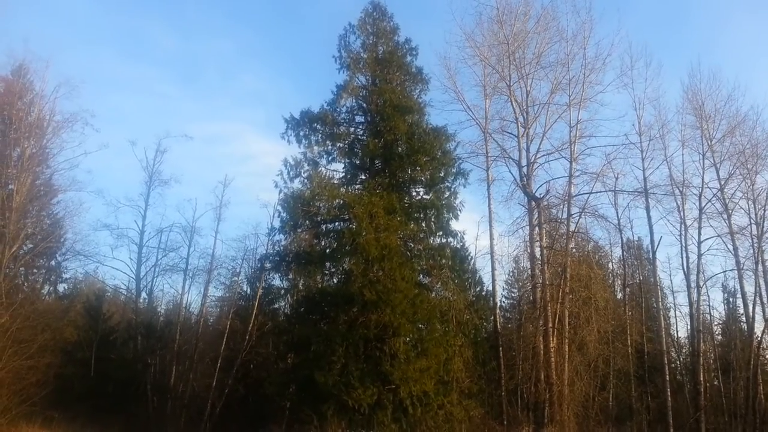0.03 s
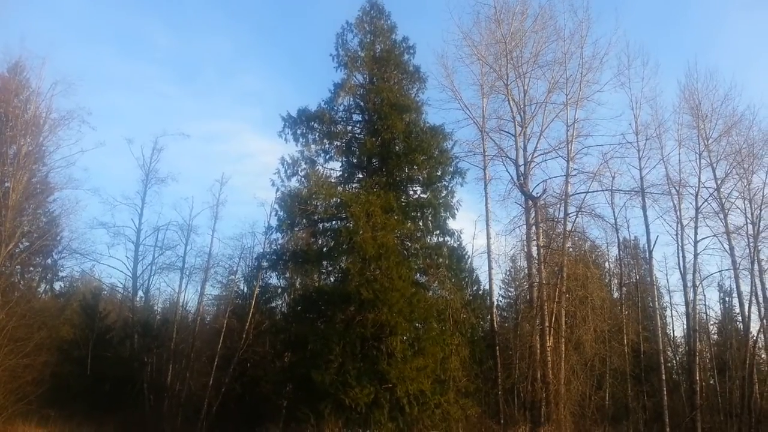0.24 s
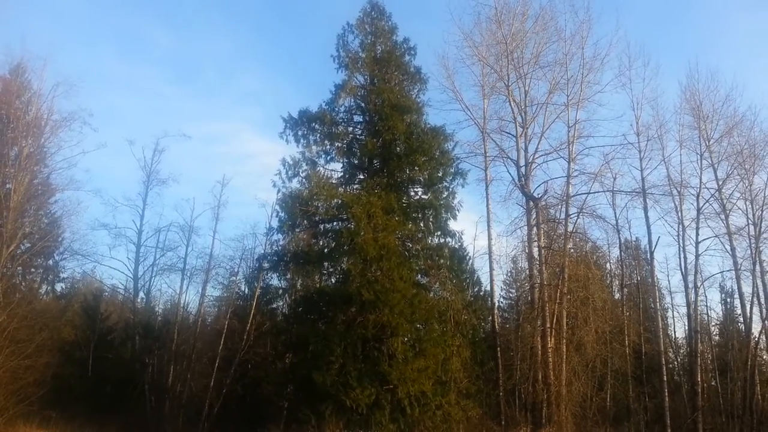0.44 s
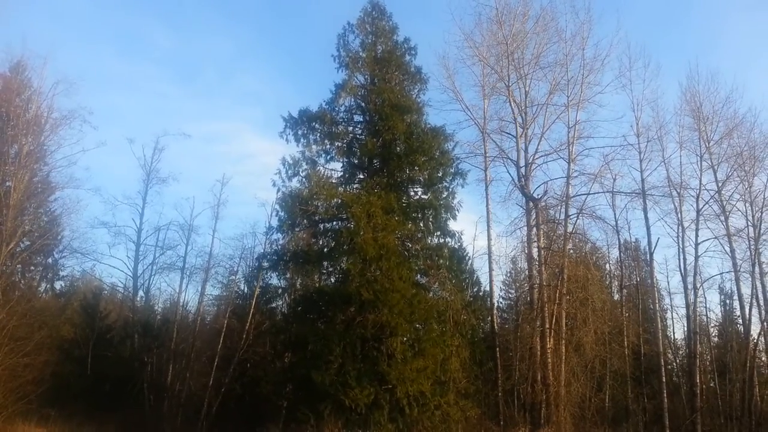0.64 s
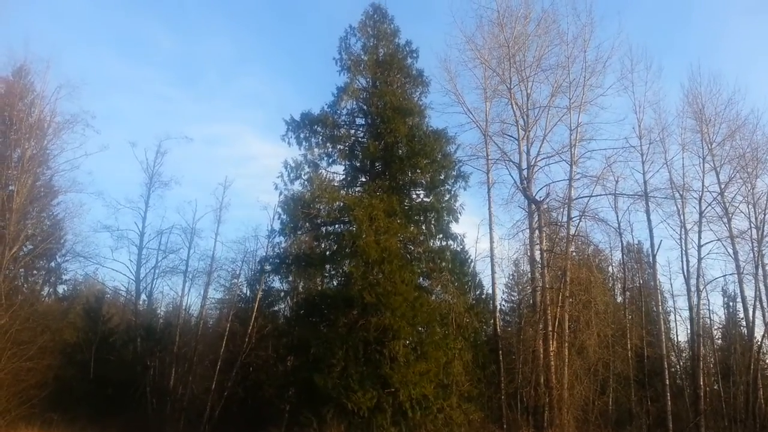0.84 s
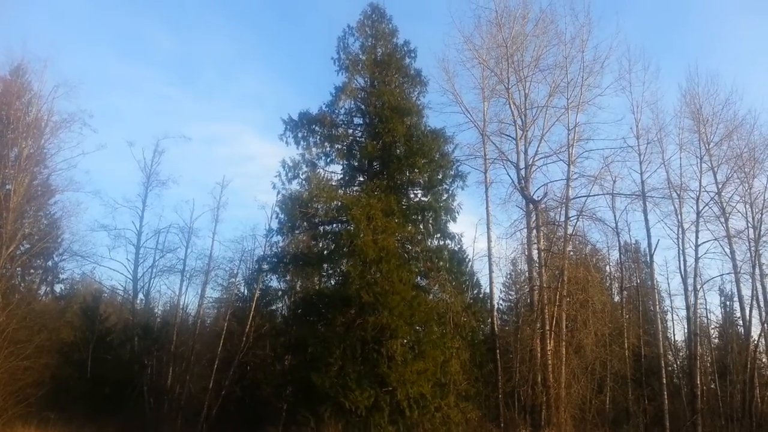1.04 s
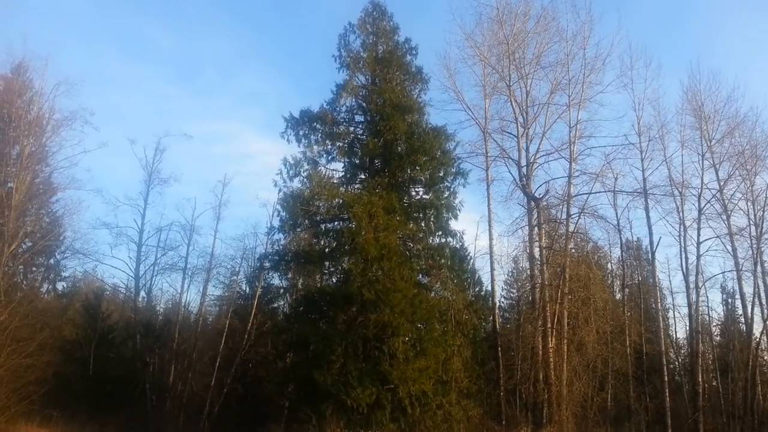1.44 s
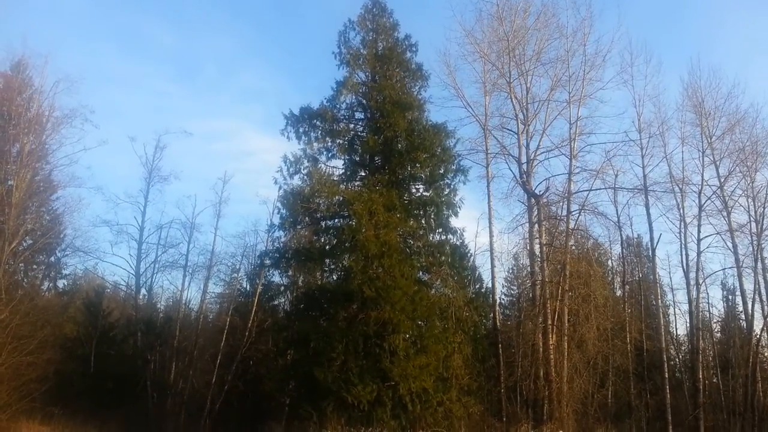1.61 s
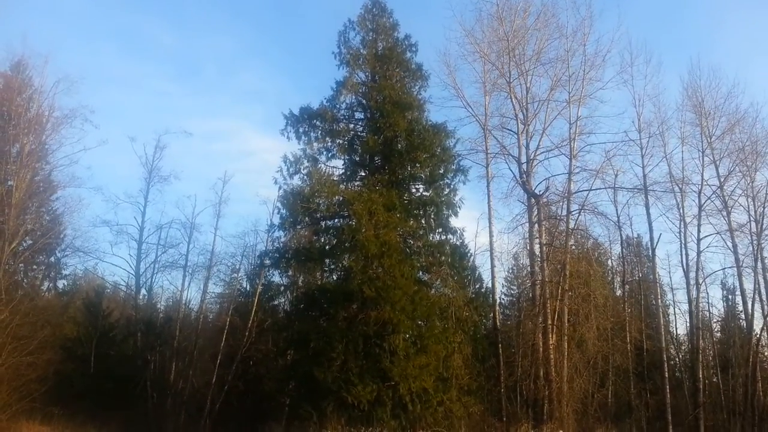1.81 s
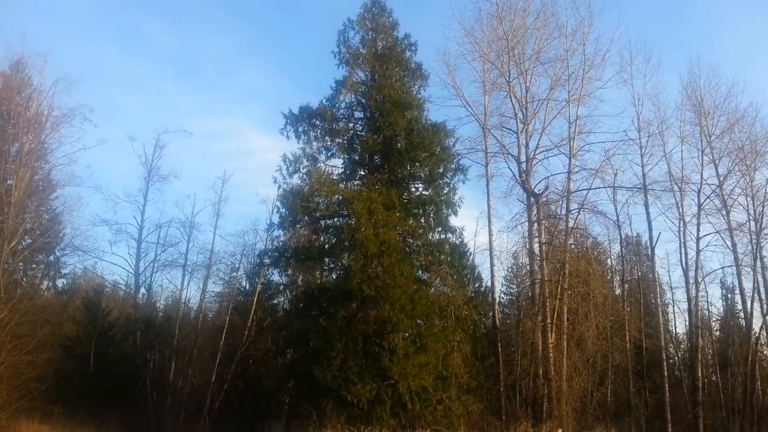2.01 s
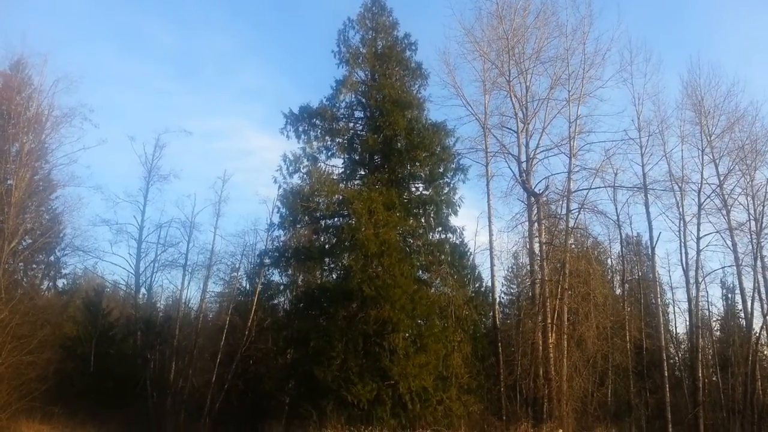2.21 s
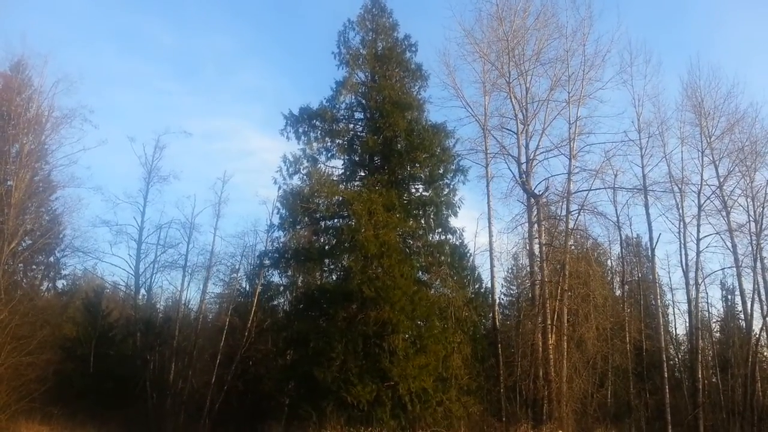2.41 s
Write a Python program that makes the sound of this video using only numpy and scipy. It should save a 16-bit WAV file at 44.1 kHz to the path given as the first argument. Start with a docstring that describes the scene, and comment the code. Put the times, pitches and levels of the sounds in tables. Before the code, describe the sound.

A bullet whizzes over the microphones with a quick falling whistle and gritty hiss. Sharp cracks come back from trees on the left, then distant reports roll away and fade into the quiet of a woodland edge.

```python
"""A quiet woodland edge, a stereo pair of microphones under the path of a bullet.
After a soft thud close by, the bullet passes overhead: a falling whistle and a low swoop in gritty hiss.
Sharp cracks come back from the trees on the left, over a low hum and a wash of shock scattered by twigs
and trunks; then distant reports roll away. A far bird, a low rumble on the microphones and a small tick
follow."""
import sys
import numpy as np
from scipy import signal
from scipy.fft import rfft, irfft
from scipy.io import wavfile
from scipy.ndimage import uniform_filter1d

SR = 44100
rng = np.random.default_rng(int(sys.argv[2]) if len(sys.argv) > 2 else 0)


def waveform_to_disk(signal):
    """Save audio, clipped to [-1, 1], as 16-bit WAV at the path in sys.argv[1]."""
    frames = np.transpose(np.atleast_2d(signal))
    scaled = np.clip(frames, -1, 1) * 32767
    samples = np.round(scaled).astype(np.int16)
    wavfile.write(sys.argv[1], SR, samples)


N = 112454
T = np.arange(N) / SR
FRAME_S = np.arange(N // 256 + 5)[:, None] * 256 / SR  # times of the short noise frames
HZ = np.fft.rfftfreq(1024, 1 / SR) + 1  # bins of one frame
HZ_FINE = np.fft.rfftfreq(N, 1 / SR) + 1  # bins of the whole scene


def amp(db):
    return 10 ** (np.asarray(db) / 20)


def unit_rms(x):
    return x / np.sqrt(np.mean(x ** 2) + 1e-20)


def spectrum(points, hz):
    """A table's values at hz, joined on a log-frequency axis."""
    freqs, values = np.transpose(points)
    return np.interp(np.log(hz), np.log(freqs), values)


def resonances(modes, hz):
    """The summed gain of a few flat-topped peaks."""
    return sum(amp(db) / (1 + (2 * (hz - centre) / width) ** 4) for centre, width, db in modes)


def follow(rows, column):
    """One column of a time curve at every sample."""
    rows = np.array(rows)
    return np.interp(T, rows[:, 0], rows[:, column])


def envelope(rows, column=1):
    """Gain along a level curve, faded in and out over 2 ms at its ends."""
    gate = np.clip((T - rows[0][0]) / .002, 0, 1) * np.clip((rows[-1][0] - T) / .002, 0, 1)
    return amp(follow(rows, column)) * gate


def pan(pan_db):
    """Gains at the two microphones; pan_db is left minus right."""
    return amp(np.array([[.5], [-.5]]) * pan_db)


def phase(pitch_hz):
    return 2 * np.pi * np.cumsum(pitch_hz) / SR


def add(mix, start_s, sound):
    part = mix[:, round(start_s * SR):][:, :sound.shape[1]]
    part += sound[:, :part.shape[1]]


def complex_noise(*shape):
    return rng.standard_normal(shape) + 1j * rng.standard_normal(shape)


# How alike diffuse sound is at the two microphones: freq_hz, correlation
MIC_CORRELATION = [(30, -0.67), (120, .65), (500, 0.45), (1200, .35), (2500, .05), (4500, -0.091),
                   (7000, -0.094), (14000, .05)]
def noise(colour_db, change_db=0):
    """Coloured stereo noise of unit level, then raised or lowered frame by frame by change_db."""
    left, unrelated = complex_noise(2, len(FRAME_S), len(HZ))
    alike = spectrum(MIC_CORRELATION, HZ)
    right = alike * left + np.sqrt(1 - alike ** 2) * unrelated
    frames = np.array([left, right]) * unit_rms(amp(colour_db))
    steady, changing = (
        signal.istft(z, nperseg=1024, noverlap=768, time_axis=1, freq_axis=2)[1][:, :N]
        for z in (frames, frames * amp(change_db)))
    return changing / steady.std()


def grit(depth_db, samples):
    """A flickering gain, like the uneven strength of the tiny echoes in a wash."""
    flicker = uniform_filter1d(uniform_filter1d(rng.standard_normal(N), samples), samples)
    return unit_rms(amp(depth_db * np.clip(unit_rms(flicker), -3, 3)))


# Woodland background, all around: freq_hz, gain_db
AIR_COLOUR = [(25, -16.5), (60, -8), (150, -6.5), (250, -12), (550, -16.5), (850, -12), (1250, -18),
              (2200, -26), (4300, -26.5), (8000, -30), (13500, -27.5), (15000, -32.5)]
def air():
    """The quiet of the woodland, a little louder on the left."""
    return noise(spectrum(AIR_COLOUR, HZ)) * amp(-68.5) * pan(5) * grit(depth_db=0.3, samples=900)


# Knocks near the microphones: start_s, level_db, tilt_db_per_octave, decay_s, rustle_db
KNOCKS = [(0.0514, -39.5, -0.5, 0.0095, -19), (2.4953, -63, 11, 0.018, -7.5)]
# Their tone before the tilt: freq_hz, gain_db
KNOCK_COLOUR = [(30, -11), (90, -2), (200, -8.5), (500, -32.5), (1100, -11.5), (2000, -16), (2900, -15),
                (4500, -27.5), (8000, -34.5), (15000, -48)]
def knocks(rustle_s=0.0105):
    """A dull thud first and a faint bright knock last, each inside a brief rustle."""
    out = np.zeros((2, N))
    for start, db, tilt_db, decay_s, rustle_db in KNOCKS:
        away_s = abs(T - start)
        hit = (T >= start) * np.exp(-away_s / decay_s)
        rustle = amp(rustle_db) * np.exp(-away_s / rustle_s)
        out += amp(db) * (hit + rustle) * noise(spectrum(KNOCK_COLOUR, HZ) + tilt_db * np.log2(HZ))
    return out * pan(2.5)


# Hiss of the incoming bullet: time_s, level_db
APPROACH = [(.14, -88), (.168, -72), (.188, -64), (.198, -76), (.209, -62), (.2135, -49.5), (.225, -49),
            (.25, -52), (.27, -76)]
# Its tone: freq_hz, gain_db
APPROACH_COLOUR = [(100, -12.5), (700, -9.5), (1600, -15), (2600, -3.5), (3800, -7), (6100, 1),
                   (7500, -4.5), (9500, -14.5), (15000, -19.5)]
def approach():
    """A faint hiss runs ahead of the bullet and jumps just before it passes."""
    return noise(spectrum(APPROACH_COLOUR, HZ)) * envelope(APPROACH) * grit(depth_db=2.5, samples=30)


# Hollows in the hiss just after the pass: centre_s, half_length_s, freq_hz, half_width_octaves, gain_db
HOLLOWS = [(.305, .035, 1380, .2, -24), (.297, .028, 620, .35, -20), (.39, .05, 450, .3, -22),
           (.284, .012, 3450, .1, -26)]
def hollows():
    """Brief dips in the spectrum, in dB, that give the pass its phasing sound."""
    return sum(db * np.exp(-((FRAME_S - centre) / length) ** 2 - (np.log2(HZ / hz) / width) ** 2)
               for centre, length, hz, width, db in HOLLOWS)


# The bullet's wake overhead: time_s, level_db, pan_db
WAKE = [(.221, -75, -4), (.227, -45.5, -3), (.236, -33.5, 2.5), (.25, -26, 1), (.266, -25, 2.5),
        (.283, -27.5, 5.5), (.325, -33, 3.5), (.43, -39.5, -0.5), (.56, -43, -1.5), (.8, -67.5, -8),
        (1.1, -80, 15)]
# Its tone: freq_hz, gain_db
WAKE_COLOUR = [(60, -19.5), (170, -15.5), (400, -32), (650, -29), (1000, -16.5), (1400, -29), (2000, -18),
               (3300, -13), (4600, -5.5), (5800, -4), (7000, 0.5), (8200, -3.5), (10500, -10), (15000, -17)]
def wake():
    """Gritty hiss that swells with the pass and dies away."""
    hiss = noise(spectrum(WAKE_COLOUR, HZ), hollows()) * grit(depth_db=2.5, samples=24)
    return hiss * envelope(WAKE) * pan(follow(WAKE, 2))


# The whistle right over the microphones: time_s, pitch_hz, level_db, pan_db
WHISTLE = [(.226, 10980, -61.5, 2.5), (.237, 10020, -48, -0.5), (.248, 8300, -33.5, -8.5),
           (.2533, 7350, -19.5, -10), (.261, 5800, -21.5, 7), (.27, 4130, -27.5, -3.5),
           (.278, 3106, -57.5, -4), (.286, 2660, -38.5, 0.5), (.3, 2590, -48, -4)]
# The low swoop under it: time_s, pitch_hz, level_db, pan_db
SWOOP = [(.229, 391.4, -60.5, -1), (.245, 346, -47.5, 3.5), (.258, 240, -38, -0.5), (.267, 170, -48.5, 12),
         (.275, 130, -49.5, -2), (.295, 90, -53.5, 0), (.325, 79.9, -62, 5)]
def passing_tone(rows, rough_db):
    """A slightly ragged tone that falls as the bullet goes by."""
    tone = np.sqrt(2) * np.sin(phase(follow(rows, 1))) * grit(rough_db, samples=30)
    return tone * envelope(rows, column=2) * pan(follow(rows, 3))


# Glints in the wake overhead: start_s, length_s, from_hz, to_hz, level_db, pan_db
CHIRPS = [(0.2618, 0.0028, 8700, 8100, -33.5, -3.5), (.2652, 0.0027, 7100, 6830, -22, 3),
          (0.2724, 0.0047, 7100, 7160, -28.5, -11), (0.281, 0.0054, 8000, 8850, -30, 0.5),
          (0.298, 0.03, 6200, 8420, -36, 8), (.302, 0.0093, 6700, 6700, -29, 4),
          (0.333, .036, 6200, 8400, -37.5, 3)]
def chirps(width_hz=460):
    """Short chirps, each a narrow band of noise carried along a pitch line."""
    out = np.zeros((2, N))
    narrow = signal.butter(2, width_hz / 2, fs=SR)
    for start, length, from_hz, to_hz, db, pan_db in CHIRPS:
        progress = np.linspace(0, 1, int(length * SR))
        carrier = np.exp(1j * phase(from_hz + (to_hz - from_hz) * progress))
        fuzz = signal.lfilter(*narrow, complex_noise(2, 8192))[:, -len(progress):]
        arch = np.sqrt(abs(np.sin(np.pi * progress)))
        add(out, start, amp(db) * pan(pan_db) * unit_rms((fuzz * carrier).real * arch))
    return out


# Wash from the trees, mostly on the left: time_s, level_db, pan_db
SCATTER = [(.27, -50, -12), (.33, -43, 3), (.455, -49, 7), (.505, -35, 6), (.55, -41, 12.5),
           (.65, -41, 5.5), (.72, -39.5, 6), (.88, -47, 5.5), (.95, -55, 4.5), (.995, -56.5, 6),
           (1.025, -47.5, 6), (1.06, -54, 6.5), (1.09, -65, 5), (1.15, -59, 13)]
# Its tone: freq_hz, gain_db
SCATTER_COLOUR = [(40, -20.5), (110, -10), (300, -16.5), (500, -16.5), (1100, -11.5), (1800, -15),
                  (2800, -11), (4000, -1), (5000, 0), (6800, -5), (8500, -16.5), (11000, -25),
                  (15000, -42.5)]
def scatter(filled_at_s=0.32):
    """Countless twigs and trunks return the shock as a grainy wash, thin at first."""
    thin_db = -6 * np.clip((filled_at_s - FRAME_S) / .12, 0, 1) / (1 + (HZ / 1600) ** 4)
    wash = noise(spectrum(SCATTER_COLOUR, HZ), hollows() + thin_db) * grit(depth_db=1.5, samples=50)
    return wash * envelope(SCATTER) * pan(follow(SCATTER, 2))


# Low boom lingering in the woods: time_s, level_db
BOOM = [(0, -83), (.3, -75), (.5, -67.5), (.75, -63.5), (.95, -72.5), (1.13, -67), (1.25, -66),
        (1.42, -65.5), (1.7, -70.5), (2.0, -81), (2.55, -79)]
# Its resonances: centre_hz, width_hz, gain_db
BOOM_MODES = [(97, 13, -0.5), (133.6, 16, -1.5)]
def boom():
    """Two low resonances that swell and hum on under the echoes."""
    hum = irfft(rfft(rng.standard_normal(N)) * resonances(BOOM_MODES, HZ_FINE), N)
    return unit_rms(hum) * amp(follow(BOOM, 1)) * pan(2)


# Cracks from the trees on the left: start_s, level_db, pan_db, tilt_db_per_octave, splinter_db
CRACKS = [(.4676, -12.5, 5, 2.5, -10), (.4741, -26, 5, -1, -6), (.4807, -13, 6, 1.5, -8),
          (.4826, -15, 6, 4, -8), (.4858, -20, 6, 0, -5), (.4955, -5.5, 8, 5, -9), (.4965, -9.5, 5, 3, -7),
          (.5024, -20, 4, -6, -3), (.5066, -18, 5, 3, -1), (.5085, -16.5, 6, 0, -3), (.657, -35, 8, -9, -1),
          (.6694, -16, 10, 1, -6), (.6844, -5, 15, -4, -10), (.7075, -33, 9, 1, 3), (.7335, -34, 8, -4, 4),
          (1.0197, -32, 9, 0, 0), (1.114, -20, 9, 8, -2), (1.2155, -23, 10, -2, 0), (1.385, -33, 8, 0, 2)]
# Their tone before tilt and air loss: freq_hz, gain_db
CRACK_COLOUR = [(100, -45), (700, -26.5), (1500, -19), (2600, -10), (3700, 1.5), (5000, 3), (6300, -6),
                (8500, -20.5), (11000, -21.5), (15000, -36.5)]
def cracks(splinter_s=.003, loss_db_per_s_at_10khz=15):
    """Sharp pulses with splinter echoes; later ones have come further and lost more treble."""
    out, size = np.zeros((2, N)), 2048
    hz, t = abs(np.fft.fftfreq(size, 1 / SR)) + 1, np.arange(size) / SR
    octaves = np.log2(np.clip(hz, 1000, 7000) / 1000)
    for start, db, pan_db, tilt_db, splinter_db in CRACKS:
        air_loss_db = loss_db_per_s_at_10khz * (start - CRACKS[0][0]) * (hz / 10000) ** 2
        log_gain = np.log(1e-5 + amp(spectrum(CRACK_COLOUR, hz) + tilt_db * octaves - air_loss_db))
        pulse = np.fft.ifft(np.exp(np.conj(signal.hilbert(log_gain)))).real  # minimum phase: sharp front
        echoes = rng.standard_normal((2, size)) * np.exp(-t / splinter_s) * (1 - np.exp(-t / .001))
        echoes *= amp(splinter_db) / np.linalg.norm(echoes, axis=1, keepdims=True)
        echoes[:, 0] += 1  # the main arrival
        echoes[0] = np.roll(echoes[0], 6)  # 6 samples later at the left microphone
        crack = signal.fftconvolve(echoes, pulse[None] / abs(pulse).max(), axes=1)
        add(out, start, amp(db) * pan(pan_db) * crack)
    return out


# Faint bright hiss in both channels: time_s, level_db
FIZZ = [(.7, -87), (.85, -60.5), (.97, -76), (1.03, -58), (1.09, -73), (1.13, -65), (1.3, -66.5),
        (1.42, -60), (1.55, -66.5), (1.85, -75.5), (2.0, -90)]
# Its tone: freq_hz, gain_db
FIZZ_COLOUR = [(3000, -5), (7000, -1.5), (9000, -3), (15000, -7)]
def fizz():
    """A faint bright hiss that swells and fades unevenly through the middle of the scene."""
    return noise(spectrum(FIZZ_COLOUR, HZ)) * envelope(FIZZ)


# Reports far off to the left: start_s, level_db, pan_db, body_db, edge_hz, t60_ratio, roll_s
REPORTS = [(1.111, -38.5, 7, -6, 6970, 2.4, 0.26), (1.192, -50, 3, 4, 1180, 0.52, 0.046),
           (1.212, -32, 6, -3, 5800, 0.98, 0.42), (1.38, -42, 8.5, -4, 6400, 0.93, 0.19),
           (1.663, -58.5, 7.5, 7, 4340, 0.89, .15), (1.812, -66, 6.5, 6, 4000, .9, 0.021)]
# Their shared tone: freq_hz, gain_db
REPORT_COLOUR = [(40, -23), (110, -7.5), (330, -11.5), (600, -9), (840, -1), (1030, -5), (1300, -2),
                 (2100, -6), (2800, -5), (3900, 1.5), (5500, -1.5), (8000, -2.5), (15000, -20)]
# Decay of the woods, scaled by each report's t60_ratio: freq_hz, t60_s
WOODS_T60 = [(100, 1.2), (800, 1.01), (2000, 1.26), (4000, .72), (7000, 0.39), (14000, 0.43)]
def reports(rise_s=0.0041, body_below_hz=3000, treble_fall_db_per_s=185):
    """Distant reports start abruptly, roll among the trees for a while, then drop away, treble first."""
    out = np.zeros((2, N))
    for start, db, pan_db, body_db, edge_hz, t60_ratio, roll_s in REPORTS:
        shelf_db = body_db / (1 + (HZ / body_below_hz) ** 6)
        treble_cut_db = 20 * np.log10(np.hypot(1, (HZ / edge_hz) ** 7.4))
        decay_db = 60 * np.maximum(FRAME_S - start, 0) / (t60_ratio * spectrum(WOODS_T60, HZ))
        fall_db = treble_fall_db_per_s * np.maximum(FRAME_S - start - roll_s, 0) * HZ / (HZ + 1540)
        roll = noise(spectrum(REPORT_COLOUR, HZ) + shelf_db - treble_cut_db, -decay_db - fall_db)
        out += roll * np.clip((T - start) / rise_s, 0, 1) * amp(db) * pan(pan_db)
    return out * grit(depth_db=1, samples=80)


# A bird far off to the right: start_s, length_s, from_hz, to_hz, level_db
BIRD_CALLS = [(1.859, 0.079, 5080, 4800, -78), (2.38, .12, 4870, 4675, -80)]
def bird():
    """Thin, slightly falling whistles."""
    out = np.zeros((2, N))
    for start, length, from_hz, to_hz, db in BIRD_CALLS:
        progress = np.linspace(0, 1, int(length * SR))
        tone = np.sin(phase(from_hz + (to_hz - from_hz) * progress))
        add(out, start, amp(db) * pan(-5) * np.sin(np.pi * progress) * tone)
    return out


# Air or handling on the microphones: time_s, level_db
RUMBLE = [(2.13, -77), (2.155, -52), (2.178, -45), (2.2, -51), (2.22, -48.5), (2.27, -50), (2.29, -46.5),
          (2.31, -52), (2.35, -86)]
# Its tone: freq_hz, gain_db
RUMBLE_COLOUR = [(15, -30.5), (25, -7), (71, 0), (135, -4.5), (250, -21.5), (427, -22.5), (475, -24),
                 (903, -23), (3830, -45), (13500, -46), (15000, -59)]
# Its balance across the pair: freq_hz, pan_db
RUMBLE_PAN = [(60, -23.5), (110, -13), (200, -6), (380, 7), (1300, 5.5), (15000, 2)]
def rumble():
    """A brief lumpy rumble, its bass mostly on the right microphone."""
    spread = pan(spectrum(RUMBLE_PAN, HZ_FINE))
    gust = noise(spectrum(RUMBLE_COLOUR, HZ))
    return irfft(rfft(gust) * spread / spread.mean(0), N) * envelope(RUMBLE)


# Resonances of a tick to the left: centre_hz, width_hz, gain_db
TICK_MODES = [(4120, 550, 1.5), (5040, 570, 1), (6720, 1500, -5.5)]
def tick(start_s=2.492, level_db=-57, rise_s=0.0022, decay_s=0.016):
    """A small dry tick with a short bright ring."""
    since_s = np.maximum(T - start_s, 0)
    ring = noise(20 * np.log10(resonances(TICK_MODES, HZ)))
    shape = np.minimum(since_s / rise_s, 1) * np.exp(-since_s / decay_s)
    return ring * shape * amp(level_db) * pan(6.5)


def scene():
    """The pass overhead, the answer from the woods and the small sounds around the microphones."""
    bullet = approach() + passing_tone(WHISTLE, rough_db=1.6) + passing_tone(SWOOP, rough_db=1.21)
    trail = wake() + chirps()
    woods = scatter() + cracks() + reports()
    background = fizz() + boom() + knocks() + tick() + rumble() + bird() + air()
    return bullet + trail + woods + background


# Response of the right microphone against the left: freq_hz, gain_db
RIGHT_MIC = [(30, 2), (100, 3.5), (300, -3), (1000, 3), (2200, 2.5), (4200, -6.5), (6000, -2.5), (7150, 5),
             (8300, 1.5), (14000, 0.5)]
def record(dry, cutoff_hz=14900):
    """The right microphone adds its own colour; both channels are then low-passed."""
    right = irfft(rfft(dry[1]) * amp(spectrum(RIGHT_MIC, HZ_FINE)), N)
    low_pass = signal.firwin(401, cutoff_hz, window=("kaiser", 8), fs=SR)
    return signal.oaconvolve(np.array([dry[0], right]), low_pass[None], "same")


dry = scene()
out = record(dry)
waveform_to_disk(out)
```